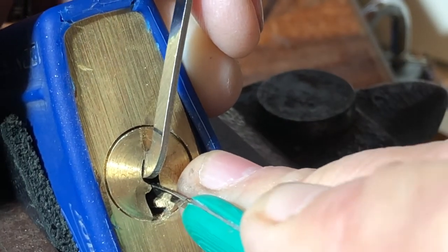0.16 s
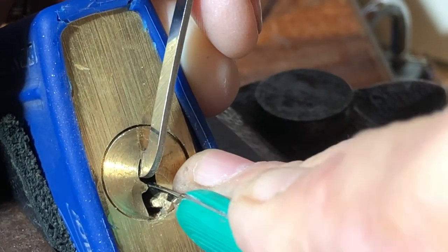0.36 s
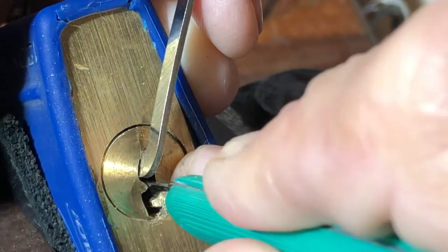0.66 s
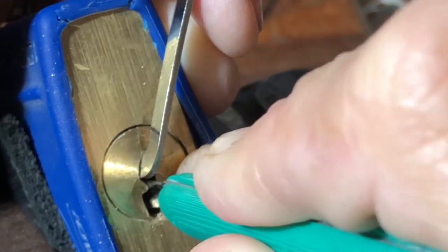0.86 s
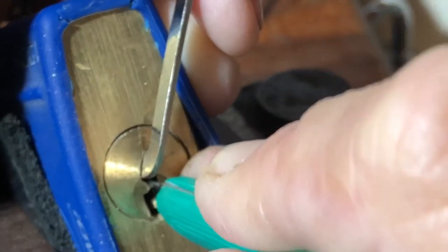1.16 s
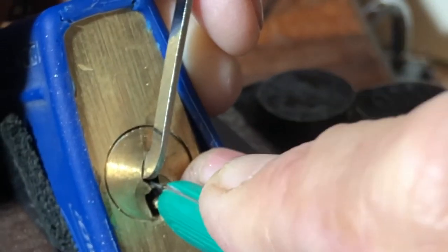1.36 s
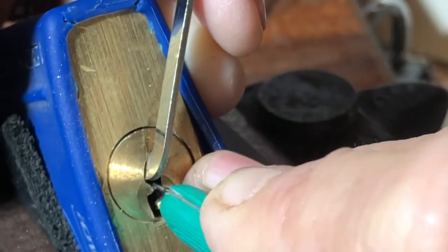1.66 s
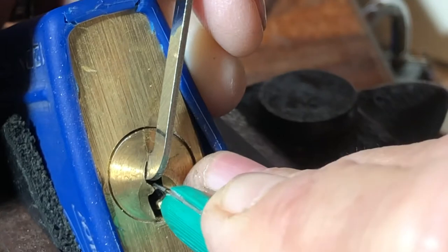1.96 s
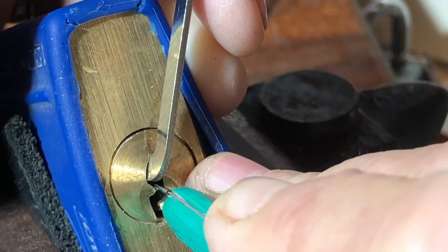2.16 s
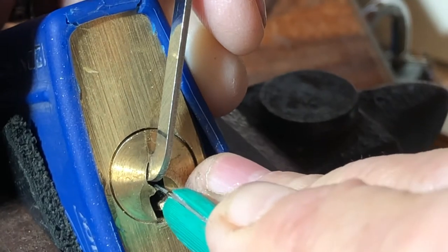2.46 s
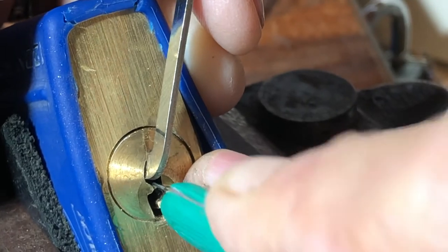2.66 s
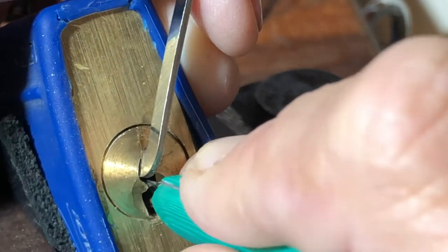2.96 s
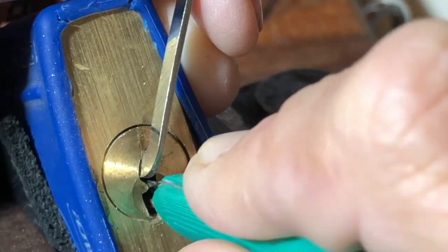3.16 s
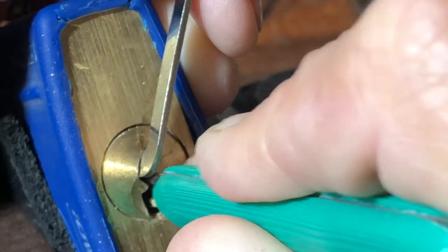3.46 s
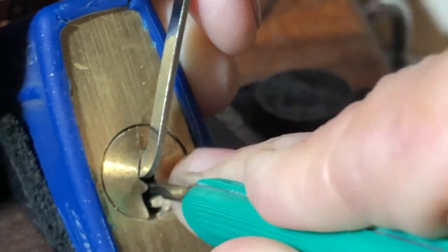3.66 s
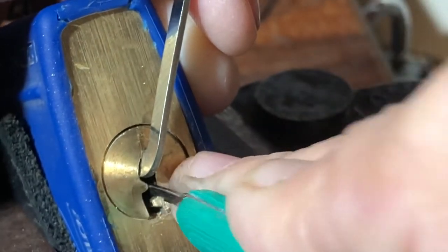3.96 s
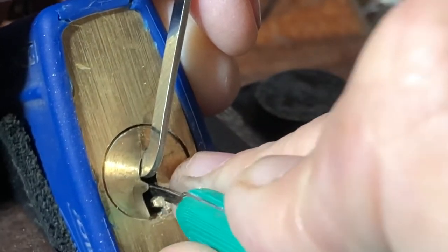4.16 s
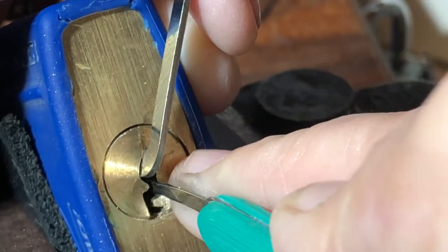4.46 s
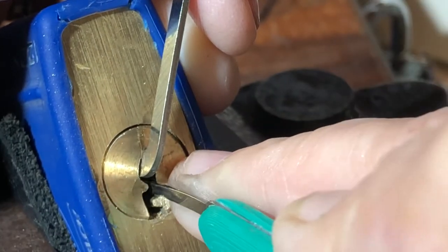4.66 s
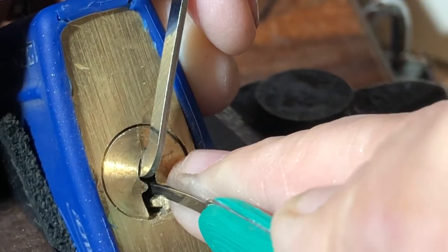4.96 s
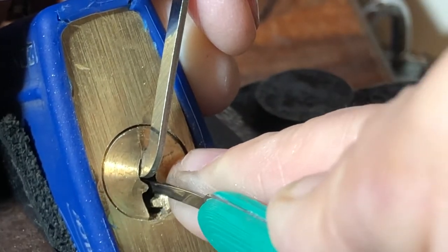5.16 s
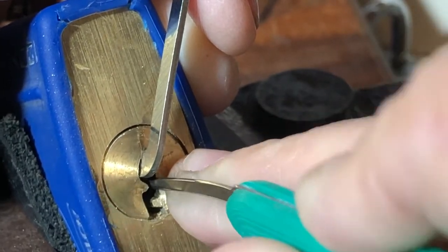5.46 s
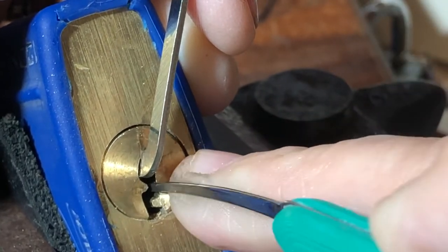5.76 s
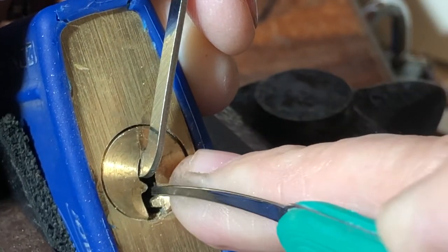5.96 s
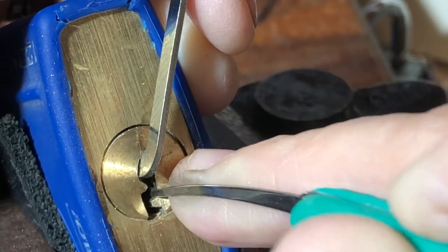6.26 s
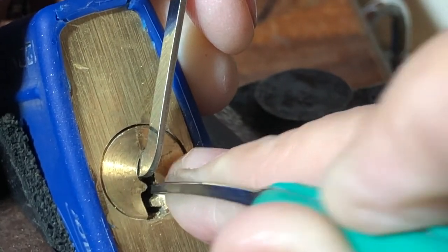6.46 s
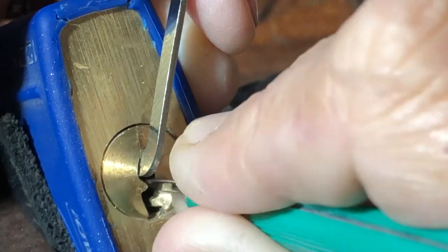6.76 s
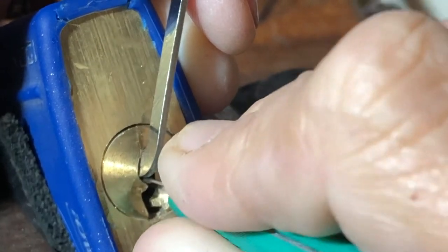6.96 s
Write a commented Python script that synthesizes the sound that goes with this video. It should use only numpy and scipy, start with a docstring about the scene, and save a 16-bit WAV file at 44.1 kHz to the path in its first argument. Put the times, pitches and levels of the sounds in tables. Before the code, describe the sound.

A close, dry take of a steel pick probing a brass padlock held on a bench in a small quiet room. In the first two seconds there are only faint ticks and soft low bumps, with clearer clicks near 0.2, 1.3 and 1.7. A crisp double tick comes at 2.4, then a bright hard snap at 3.2 and a smaller click with a short scrape at 3.5. Light ticking around 3.9 leads to the loudest snap at 4.4, with a dull bench thud. After near silence, a scratchy rattle sounds at 5.3 and another strong snap at 5.7. From 6 to 7, fidgety clusters of small clicks and thin gritty scrapes follow closely. Each touch has a very short room tail. Underneath lie soft hiss, flickering bass and a faint deep hum, swelling most around 4.5.

```python
"""Picking a padlock

A steel pick works the pins of a brass padlock clamped on a bench, a hand's width from a phone.
Pins snap and chatter as short force bursts exciting lock modes; the pick scrapes as slip noise on a singing
blade; pushes thud through vice and bench modes. A small quiet room answers with decaying noise,
over a low swelling hum and a noise hush with flickering bass."""
import sys
import numpy as np
from scipy import signal
from scipy.fft import rfft, irfft
from scipy.io import wavfile
from scipy.ndimage import uniform_filter1d

SR = 44100
rng = np.random.default_rng(int(sys.argv[2]) if len(sys.argv) > 2 else 0)


def persist_wave(psi):
    """Save psi, clipped to +-1, as 16-bit WAV."""
    counts = np.round(np.clip(psi, -1, 1) * 32767).astype(np.int16)
    wavfile.write(sys.argv[1], SR, np.atleast_2d(counts).T)


N = 313992  # samples
NOISE_TOP_HZ = 15800  # upper limit of scrapes, room reflections and hush


def clicks():
    """Impact excitation: a brief contact force drives the lock modes; returns near and mean radiation."""
    # pins and pick striking brass: start_s, level_db (over 1 ms), tilt_db_per_octave, middle_lift_db
    strikes = [(0.0741, -59, -10.5, 11), (0.1984, -36.5, -1, 0), (0.4657, -49.5, 7.5, 1),
               (0.6004, -52, -5, 0), (0.6077, -41, -6, 8.5), (0.6114, -51, -10, 14), (0.6195, -74, 2, 15),
               (0.7538, -62.5, 2, 4), (0.9495, -63.5, 5, 11), (0.997, -64.5, -1, 3),
               (1.0764, -46.5, 4, 6.5), (1.26, -37.5, -0.8, 7), (1.679, -30, -0.1, -0.5),
               (1.819, -75, -4, -5), (2.0486, -63, -9.5, 4), (2.3714, -30.5, 3.5, -5),
               (2.3744, -38, 8.2, 12), (2.643, -62.5, 6, 27), (2.647, -64, -7, -1), (2.7803, -69, -11, -13),
               (2.8303, -53, 3.5, 10), (2.9461, -55, -7, 9), (3.209, -16, 6, -4), (3.4536, -57.5, -1, -2),
               (3.4664, -27, 4, 5), (3.4746, -40, -0.5, -14), (3.4828, -47, -2.5, -21),
               (3.6177, -65, 0, -9), (3.7858, -63.5, -1.5, -3.5), (3.8225, -57, -5, -6),
               (3.8964, -43.5, 8, -4), (3.8983, -46, 1.5, 4), (3.9456, -47.5, 6, 4), (3.955, -53.5, -8, 6),
               (4.0208, -52.5, -7, 7), (4.3998, -14, 4.5, 3.5), (4.9792, -58.5, -6, 11),
               (5.1946, -54.5, -7, 2), (5.321, -32.5, 0.5, 1), (5.3278, -33.5, 9, 8), (5.3353, -41, 12, -5),
               (5.3665, -60, 3, 4), (5.411, -55, 5, 3), (5.5889, -60, 3.5, 6), (5.673, -18.5, 4, 2),
               (5.683, -44.5, 0.5, 2), (5.7249, -33.5, 4, 12.5), (5.7356, -50, 6, 4), (5.7557, -48, 6, -5),
               (5.977, -57, -1.7, 6), (5.9942, -36, 5, 1.5), (5.9977, -39.5, 6.5, -2),
               (5.9989, -41.5, 0.5, 12), (6.1925, -60, 2, 4), (6.2316, -45, 4.5, 7.5),
               (6.2884, -56.5, -2.5, -2), (6.2916, -57, -1, 0), (6.4116, -61, -14, -5),
               (6.4198, -39, 7.5, 18.5), (6.4275, -42, 1.5, 1), (6.472, -61, -1, -1.5),
               (6.4777, -46.5, 1.5, 5), (6.5468, -59.5, -1, -1), (6.5718, -59, 1, 2), (6.5772, -45.5, 9, 2),
               (6.588, -50, 3, 4), (6.5944, -37, 7, -8), (6.596, -46, 1.5, -11), (6.625, -54, 3, 6),
               (6.777, -67, 5, -5), (6.8372, -53, -1.5, -10), (6.851, -37, 1, 2.5), (6.8586, -48, -1, -1),
               (6.8618, -48, 2, 21), (6.8651, -41, -7.5, 11), (6.9275, -56.5, -7, 0),
               (6.9528, -48, -3.5, 8), (6.9725, -50.5, -2, 2)]
    # modes of lock body, pins and pick: centre_hz, width_hz, level_db
    lock_modes = [(1712, 188, -8.5), (2687, 210, -13), (3640, 280, 0.5), (4750, 290, -6), (6175, 450, 4),
                  (6670, 140, 2.5), (7780, 400, 2.5), (9210, 260, -6), (10240, 550, -0.5), (11800, 800, -2),
                  (13300, 500, -5), (13200, 1800, -4.5), (14400, 2400, -1)]
    middle_hz, middle_octaves = 4000, 1
    lead_s = 0.004
    near, spread = np.zeros(N), np.zeros(N)
    for start_s, level_db, tilt_db, middle_db in strikes:
        # lighter touches last longer
        t60_s = 0.004 - 0.00008 * (level_db + 15.5)
        force, f = blow(size=2048, lead_s=lead_s, rise_s=0.000082, t60_s=t60_s, creep_db=-25.0)

        colour_db = tilt_db * np.log2(np.clip(f, 1200, 12000) / 12000)
        colour_db += middle_db * np.exp(-(np.log2(f / middle_hz) / middle_octaves) ** 2)
        # small parts radiate little bass
        bass_loss = 1 + (500 / f) ** 2
        top_loss = 1 + (f / 16200) ** 12
        colour = undb(colour_db) / bass_loss / top_loss

        click = irfft(force * colour * body(lock_modes, f, direct_db=-1, scatter_db=3.0, detune=0.025))
        # the mean over all directions keeps the colour but not the single modes
        even = np.roll(irfft(colour), int(lead_s * SR))
        for out, x in ((near, click), (spread, even)):
            # energy of a 1 ms sound at rms 1
            one_ms = x * np.sqrt(SR / 1000 / np.sum(x ** 2))
            add(out, start_s - lead_s, undb(level_db) * one_ms)
    return near, spread


def scrapes():
    """Sliding friction: dense uneven slips excite the modes of the pick blade."""
    # steel sliding on brass: start_s, length_s, start_db, end_db, tilt_db_per_octave
    slides = [(0.594, 0.046, -62, -76, -1), (3.233, 0.032, -69.5, -64, -5.5), (3.455, 0.017, -69, -52, -5),
              (3.489, 0.049, -61.5, -74, -5), (3.54, 0.08, -68.5, -77.5, -3), (3.822, 0.023, -70, -77, -8),
              (3.939, 0.019, -68, -62, -5.5), (5.317, 0.024, -46, -56.5, -2.5), (5.343, 0.081, -69, -81, 1),
              (5.6554, 0.0091, -53, -48, 2.5), (5.663, 0.0085, -64, -50, -4.5),
              (5.684, 0.035, -71, -60.5, -13.5), (5.7212, 0.0046, -50, -43, -1), (5.728, .04, -65, -76, 3),
              (5.981, 0.015, -74, -47.5, -2), (5.999, 0.025, -54, -88, 10), (6.4, 0.038, -62, -61, -2.5),
              (6.566, 0.037, -57.5, -64, -3.5), (6.601, 0.078, -63, -80, 5),
              (6.688, .093, -81.5, -67.5, -2), (6.78, 0.061, -73.5, -71, -4.5),
              (6.832, 0.036, -65.5, -60, -2.5), (6.87, 0.11, -69.5, -81, -7)]
    # the blade sings a little while it slides: centre_hz, width_hz, level_db
    blade_modes = [(3350, 300, 3), (6750, 320, 10), (7700, 450, 4), (9600, 500, 4), (12600, 550, 4)]
    out = np.zeros(N)
    grit = undb(2.5 * walk(300))
    grain = rng.standard_normal(N) * undb(2.0 * rng.exponential(size=N)) * grit
    for start_s, length_s, start_db, end_db, tilt_db in slides:
        n = int(length_s * SR)
        slips = unit(grain[int(start_s * SR):][:n]) * undb(np.linspace(start_db, end_db, n))
        # soft ends, then room for the blade to ring on
        slips = np.pad(slips * signal.windows.tukey(n, 0.08), (0, 400))
        f = np.arange(1, len(slips) // 2 + 2) * SR / len(slips)
        colour = undb(tilt_db * np.log2(f / 6000)) / (1 + (1500 / f) ** 2) * (f < NOISE_TOP_HZ)
        shape = colour * body(blade_modes, f, direct_db=0, scatter_db=3.0, detune=0.02)
        shape /= np.sqrt(np.mean(np.abs(shape) ** 2))
        add(out, start_s, irfft(rfft(slips) * shape, len(slips)))
    return out


def thuds():
    """Structure-borne sound: a vice knock and a slow push excite bench modes through dispersive bending."""
    # pushes felt by the bench: start_s, peak_db, centre_hz, knock_db (against the push)
    pushes = [(0.071, -54.5, 198, -8), (0.194, -50, 122, -9), (0.612, -52, 242, -19), (0.741, -61, 342, -1),
              (1.262, -41, 200, -24), (1.681, -50, 250, -8), (1.819, -53.5, 213, -15.5),
              (1.938, -56.5, 202, -18), (2.049, -56.5, 205, -13), (2.372, -58.5, 188, -2),
              (2.652, -60.5, 172, -11), (2.778, -53.5, 315, -5), (2.946, -47, 208, -10.5),
              (3.211, -55.5, 301, -13), (3.247, -56.5, 361, -9.5), (3.467, -44, 238, -10),
              (3.818, -58, 326, -20), (3.951, -50.5, 242, -15.5), (4.02, -55, 307.6, -14),
              (4.4, -35.5, 210, -3.5), (4.978, -52.5, 214.4, -13.5), (5.194, -53, 293, -10),
              (5.315, -43.5, 325, -17), (5.672, -47.5, 129, -11.5), (5.724, -58, 330, -12),
              (5.999, -55, 245, -11.5), (6.228, -61.5, 225, -10), (6.41, -58.5, 205, -6),
              (6.483, -55.5, 121, -15), (6.576, -52, 118, -22), (6.849, -53, 307, -10),
              (6.864, -47.5, 328, -15), (6.954, -50.5, 323, -9)]
    # modes of vice and bench top: centre_hz, width_hz, level_db
    bench_modes = [(120, 27, 2.5), (174.7, 25, -2), (206.5, 7.3, 5), (243.1, 13, 7), (329, 24, 4),
                   (389, 14, 1.5), (510, 42, -7.5), (842, 50, -6), (990, 63, -13.5), (1737, 51, 4.5)]
    fall_db_per_octave, knock_hz = 9.5, 750
    lag_cycles, lag_s = 1.5, 0.001
    lead_s = 0.012
    out = np.zeros(N)
    for start_s, peak_db, centre_hz, knock_db in pushes:
        force, f = blow(size=16384, lead_s=lead_s, rise_s=0.0026, t60_s=0.047, creep_db=-40.0)
        knock, _ = blow(size=16384, lead_s=lead_s, rise_s=0.0006, t60_s=0.016, creep_db=-39.5)
        push = force * undb(-fall_db_per_octave * np.abs(np.log2(f / centre_hz)))
        # the vice knocks briefly ahead of the bench
        push += knock * undb(knock_db - 7 * np.log2(f / knock_hz) ** 2)
        # bending waves in the bench top: the lower, the later
        late = np.exp(-2j * np.pi * lag_cycles * np.log(np.clip(f, 60, 2000)))
        thud = irfft(push * late * body(bench_modes, f, direct_db=-6, scatter_db=2.0, detune=0.03))
        envelope = np.abs(signal.hilbert(thud))
        add(out, start_s + lag_s - lead_s, undb(peak_db) * thud / envelope.max())
    return out


def room(x):
    """Diffuse reflection from bench and near walls: convolution with noise decaying band by band."""
    # reflections by band, before the common fade: centre_hz, level_db (relative), t60_s
    decays = [(302, 7, .3), (1500, 0, 0.15), (5000, 3.5, 0.11), (11900, -11.5, 0.15)]
    level_db, gap_s, fade_s = -15, 0.0019, 0.062
    t = np.arange(SR // 2) / SR
    tail = np.zeros(len(t))
    for centre_hz, band_db, t60_s in decays:
        noise = unit(band(rng.standard_normal(len(t)), centre_hz, 0.93 * centre_hz))
        tail += undb(band_db - 60 * t / t60_s) * noise
    # a gap at first, then a tail that thins out once the early reflections are past
    tail *= (1 - np.exp(-(t / gap_s) ** 2)) / (1 + (t / fade_s) ** 6)
    tail = signal.sosfilt(signal.butter(8, NOISE_TOP_HZ, fs=SR, output="sos"), tail)
    return undb(level_db) * signal.fftconvolve(x, tail / np.sqrt(np.sum(tail ** 2)))[:N]


def hum():
    """Narrow-band noise: two resonances in series leave a wavering bass tone that swells now and then."""
    # course of the hum: time_s, level_db
    swells = [(0.0, -96), (0.67, -73.5), (1.5, -97), (2.55, -87), (2.7, -79.5), (3.45, -88), (4.2, -74),
              (4.48, -67), (4.94, -74.5), (5.27, -69), (6.19, -78), (6.5, -83.5), (6.84, -72.5),
              (7.12, -78)]
    hum_hz, width_hz = 64.4, 9
    time_s, level_db = np.transpose(swells)
    once = band(rng.standard_normal(N), hum_hz, width_hz)
    tone = unit(band(once, hum_hz, width_hz))
    return tone * undb(np.interp(np.arange(N) / SR, time_s, level_db))


def hush():
    """Shaped stationary noise of room and microphone; the bass flickers, the hiss stays smooth."""
    # noise spectrum: frequency_hz, density_db (per Hz, relative)
    spectrum = [(13, -40), (22, -7), (59, -2.5), (151, -0.5), (405, -6.5), (1520, -20), (6340, -25.5),
                (15700, -30.5)]
    level_db = -69
    frequency_hz, density_db = np.transpose(spectrum)
    f = np.arange(1, N // 2 + 2) * SR / N
    shape = undb(np.interp(np.log(f), np.log(frequency_hz), density_db)) * (f < NOISE_TOP_HZ)
    # power shares of bass and hiss sum to 1
    bass = 1 / (1 + (f / 700) ** 2)
    low = irfft(rfft(rng.standard_normal(N)) * shape * np.sqrt(bass), N)
    high = irfft(rfft(rng.standard_normal(N)) * shape * np.sqrt(1 - bass), N)
    return undb(level_db) * unit(low * undb(2.0 * walk(12)) + high)


def blow(size, lead_s, rise_s, t60_s, creep_db):
    """Contact force spectrum: noise creeps in, leaps to its peak at lead_s and dies exponentially."""
    t = np.arange(size) / SR - lead_s
    before = np.exp(t / rise_s) + undb(creep_db) * np.exp(t / (8 * rise_s))
    envelope = np.where(t < 0, before, undb(-60 * t / t60_s))
    force = rfft(rng.standard_normal(size) * envelope)
    # a hard contact pushes evenly over broad stretches of the spectrum
    force /= np.sqrt(uniform_filter1d(np.abs(force) ** 2, size=70))
    # frequencies start one bin up, to avoid zero
    return force, np.arange(1, size // 2 + 2) * SR / size


def body(modes, f, direct_db, scatter_db, detune):
    """Modal superposition: the bare contact plus resonances whose strength changes with the spot hit."""
    centre_hz, width_hz, level_db = np.transpose(modes)[:, :, None]
    strength, shift = rng.standard_normal((2, len(modes), 1))
    offset_hz = f - centre_hz * (1 + detune * shift)
    rings = undb(level_db + scatter_db * strength) / (1 + 2j * offset_hz / width_hz)
    return undb(direct_db) + rings.sum(axis=0)


def band(x, hz, width_hz):
    """Second-order resonance, gain 1 at the centre."""
    return signal.lfilter(*signal.iirpeak(hz, hz / width_hz, SR), x)


def walk(rate_hz):
    """Slow random modulation: levels held 1 / rate_hz seconds and smoothed twice, rms 1."""
    hold = int(SR / rate_hz)
    steps = np.repeat(rng.standard_normal(N // hold + 1), hold)
    smooth = uniform_filter1d(uniform_filter1d(steps, hold), hold)
    return unit(smooth[:N])


def undb(db):
    """Logarithmic level: decibels to amplitude gain."""
    return 10 ** (np.asarray(db) / 20)


def unit(x):
    """Power normalisation: scale to rms 1."""
    return x / np.sqrt(np.mean(x ** 2))


def add(out, start_s, x):
    """Superposition: mix x into out from start_s."""
    i = int(start_s * SR)
    out[i:i + len(x)] += x[:N - i]


def scene():
    """Superposition of direct sound, its reflections, the bench and the quiet behind."""
    near, spread = clicks()
    slide = scrapes()
    lock = near + slide + room(spread + slide)
    return (lock + thuds() + hum() + hush())[None]


def record(dry):
    """Band limitation: the phone drops the deepest bass and cuts the top."""
    dry = signal.sosfilt(signal.butter(2, 45, "high", fs=SR, output="sos"), dry)
    return signal.sosfilt(signal.ellip(10, 0.2, 80, 16700, fs=SR, output="sos"), dry)


dry = scene()
out = record(dry)
persist_wave(out)
```